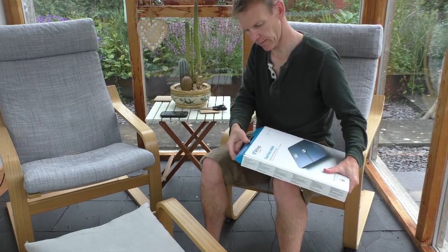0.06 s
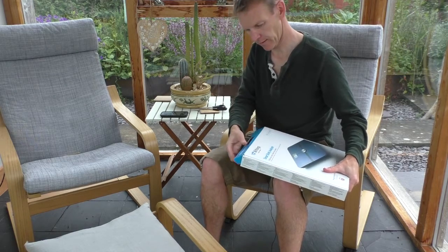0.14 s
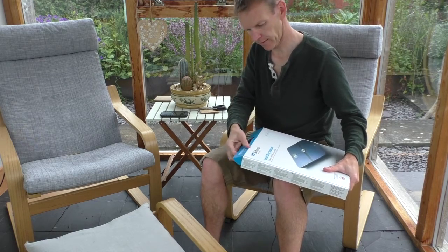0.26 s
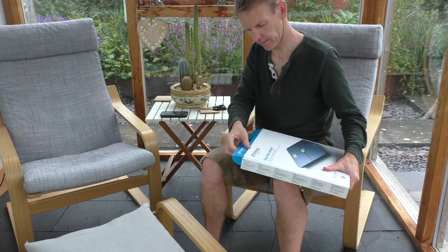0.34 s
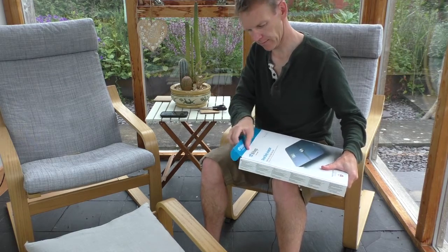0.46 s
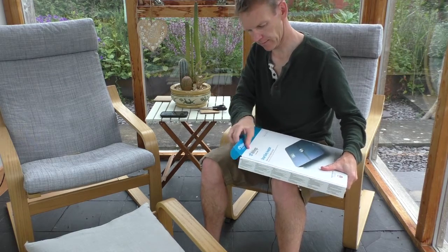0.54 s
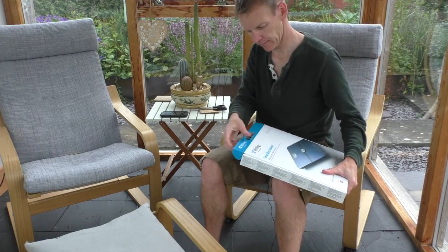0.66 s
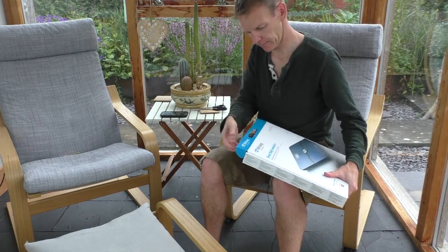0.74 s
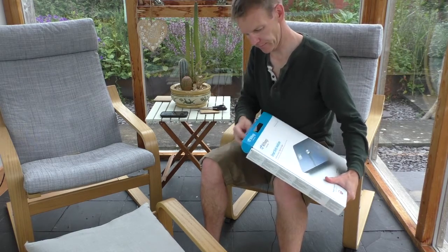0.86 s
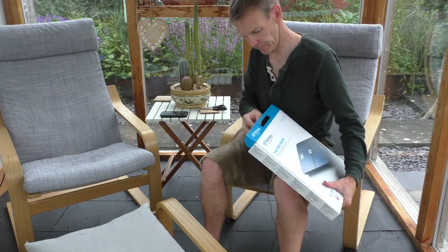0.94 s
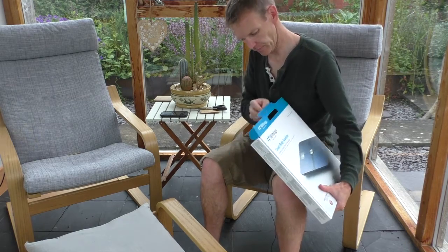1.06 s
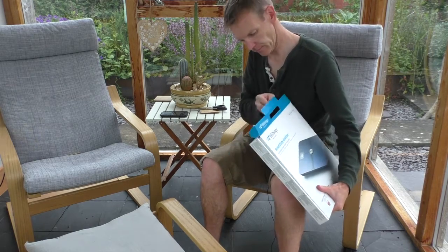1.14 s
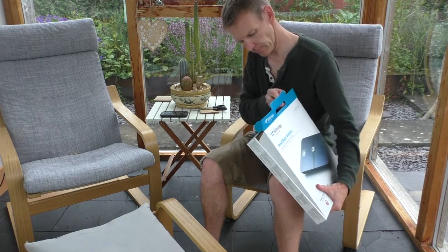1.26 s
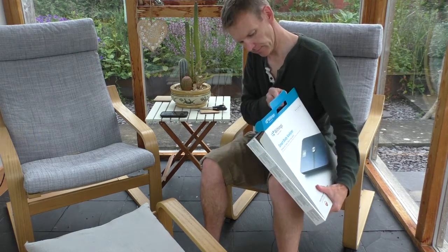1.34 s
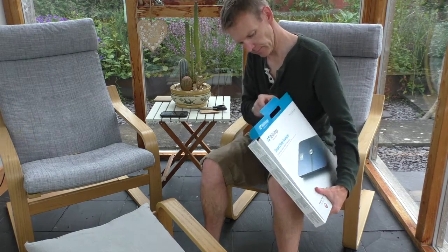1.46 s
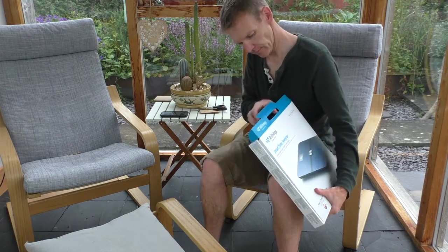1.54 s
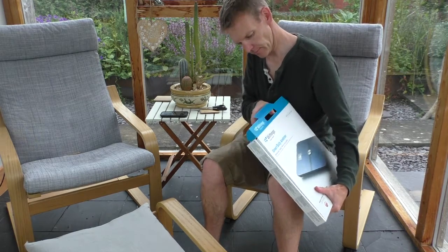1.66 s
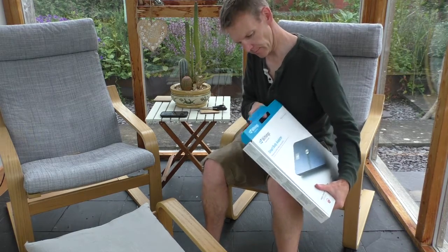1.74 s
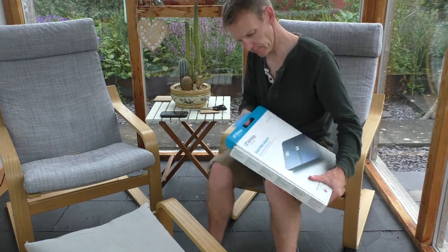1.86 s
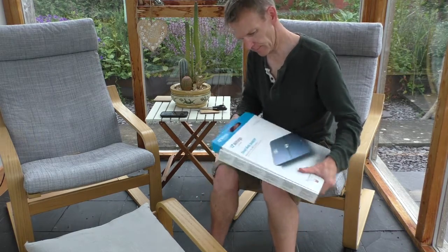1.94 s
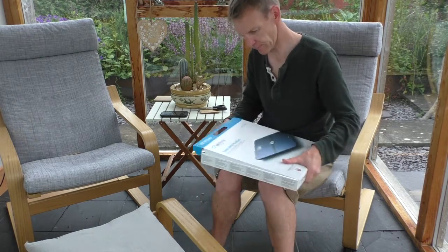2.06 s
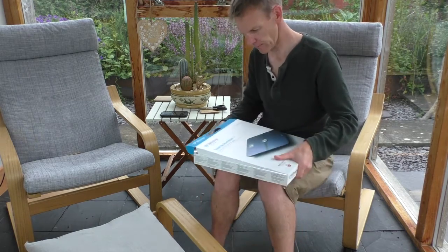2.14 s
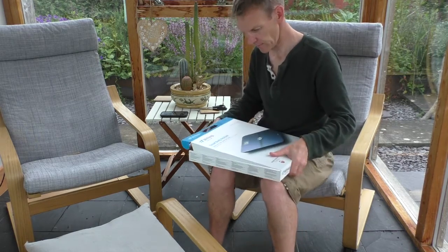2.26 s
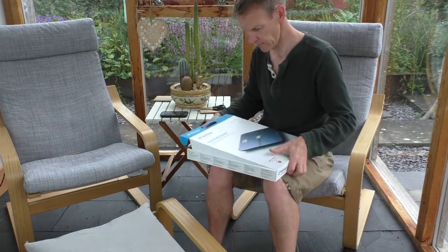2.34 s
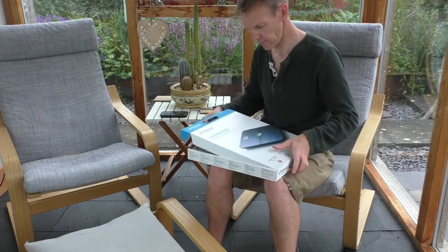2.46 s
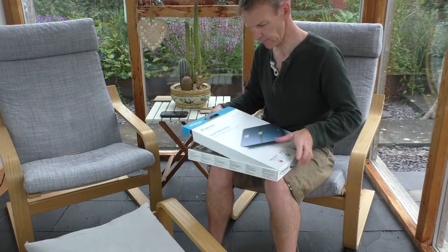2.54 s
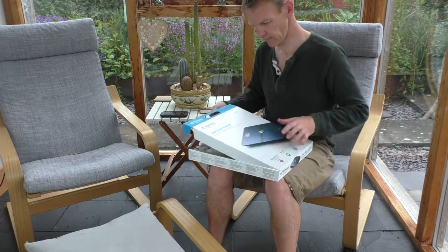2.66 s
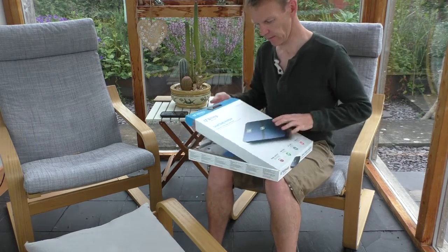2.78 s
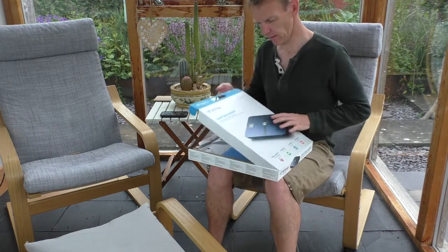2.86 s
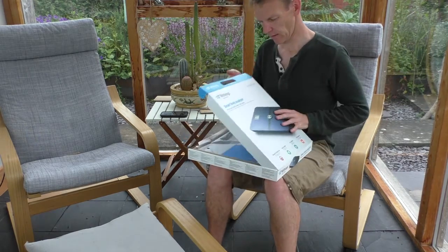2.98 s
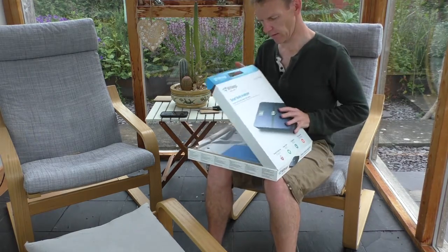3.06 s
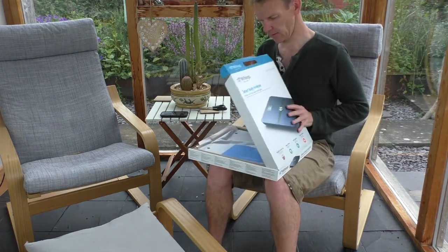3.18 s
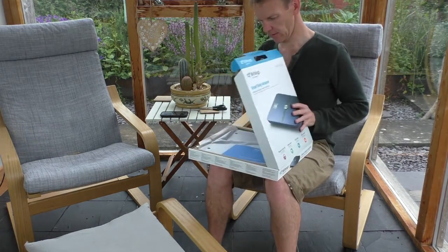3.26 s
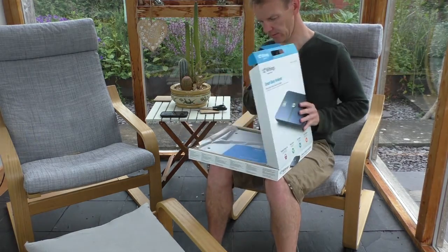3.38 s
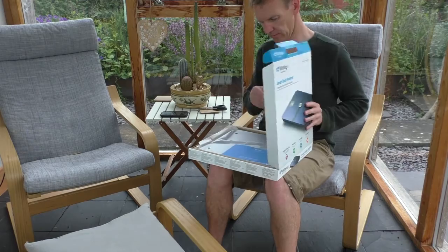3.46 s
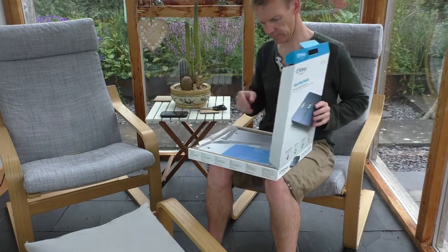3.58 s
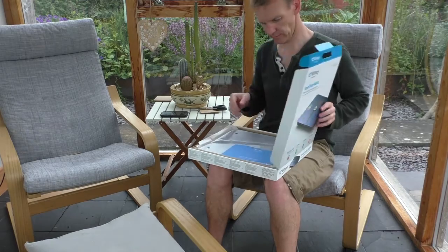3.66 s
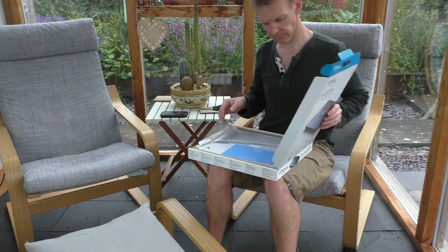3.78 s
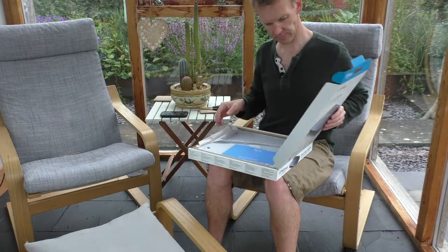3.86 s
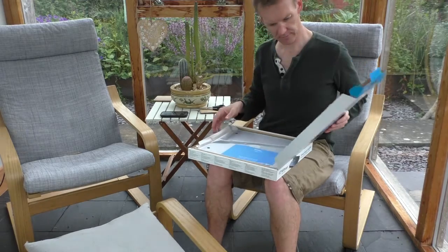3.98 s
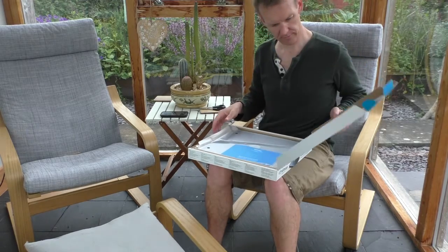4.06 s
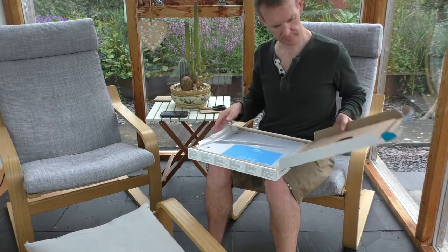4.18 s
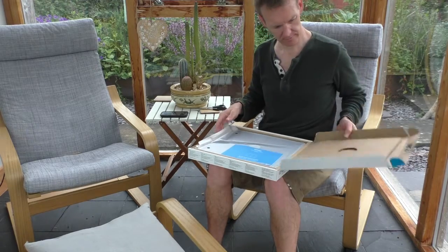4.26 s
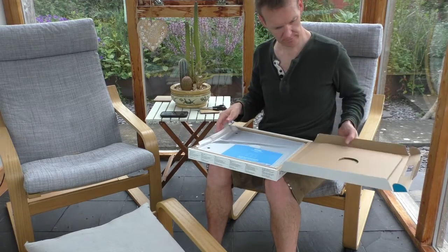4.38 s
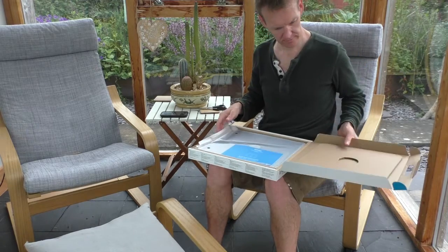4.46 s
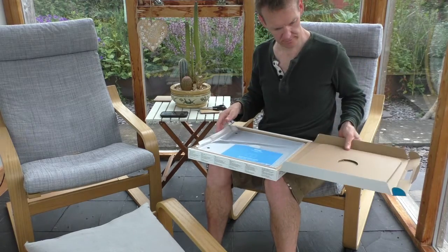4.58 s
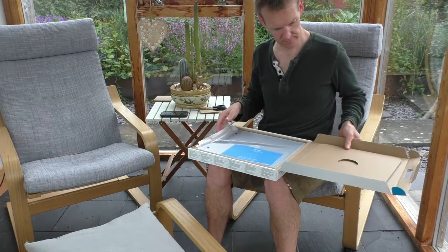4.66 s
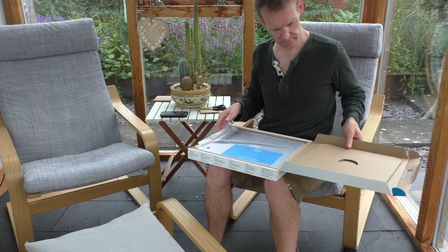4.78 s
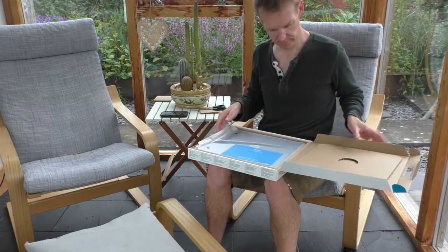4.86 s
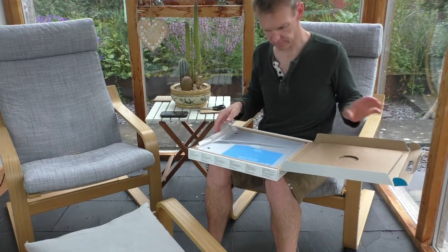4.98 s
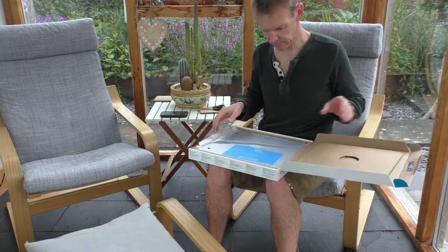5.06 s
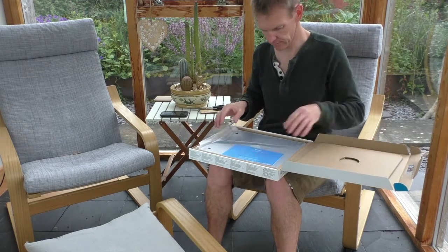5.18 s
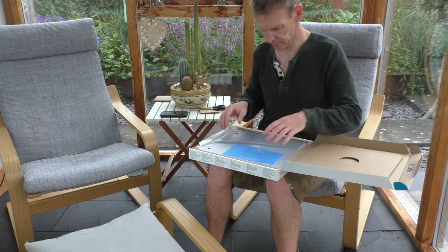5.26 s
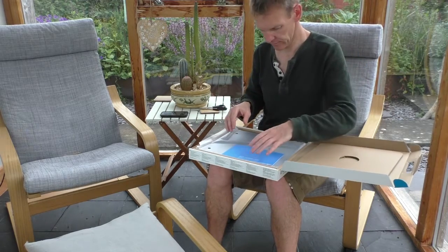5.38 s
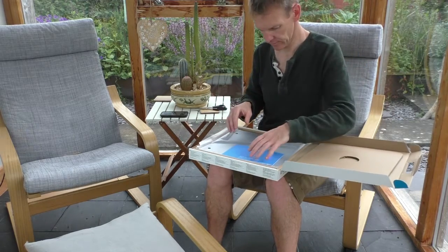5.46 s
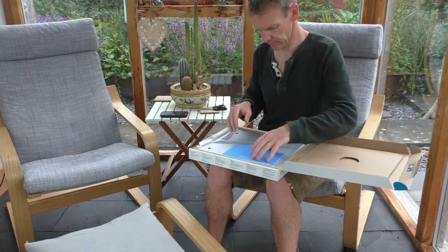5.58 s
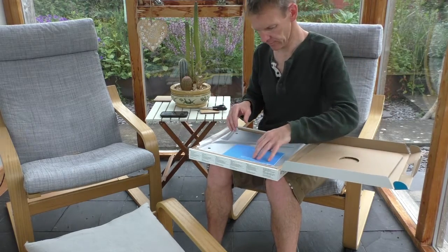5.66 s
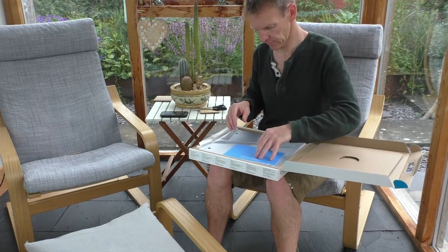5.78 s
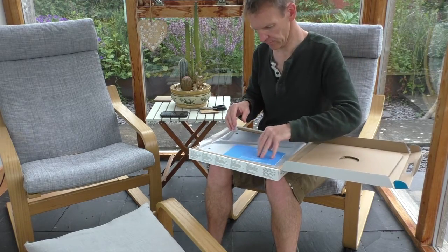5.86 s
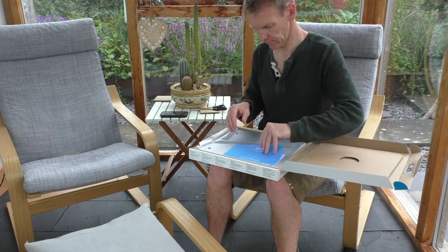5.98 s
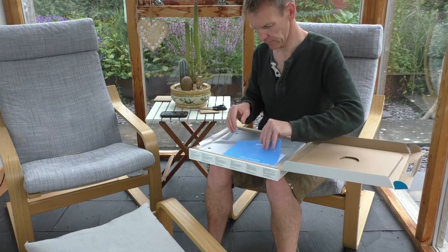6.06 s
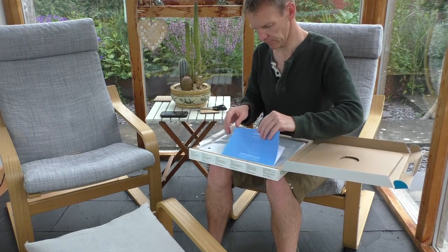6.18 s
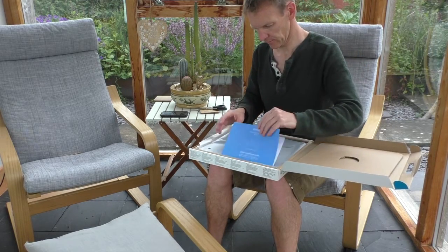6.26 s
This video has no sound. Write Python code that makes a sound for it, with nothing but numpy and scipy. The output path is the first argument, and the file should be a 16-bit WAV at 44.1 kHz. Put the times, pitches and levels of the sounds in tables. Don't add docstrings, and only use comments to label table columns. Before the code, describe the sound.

A flat cardboard box is rubbed, tapped and popped open on a lap, with hollow scrapes, soft low bumps and a faint papery slide at the end.

```python
import sys
import numpy as np
from scipy import signal
from scipy.io import wavfile
from scipy.ndimage import uniform_filter1d

SR = 44100
rng = np.random.default_rng(int(sys.argv[2]) if len(sys.argv) > 2 else 0)


def to_linear_factor(level_db):
    exponent = np.asarray(level_db, float) / 20
    return 10 ** exponent


def file_out(sig):
    cols = np.atleast_2d(sig).T
    lim = np.clip(cols, -1, 1)
    pcm = np.round(lim * 32767).astype(np.int16)
    wavfile.write(sys.argv[1], SR, pcm)


N = 279153

# t/s, peak level/dB, first push [+-1], f/Hz, t60/s
BUMPS = [(0.625, -56, -1, 64.8, 0.026), (0.916, -26, 1, 80, 0.023), (0.948, -36, 1, 109, 0.026),
         (1.181, -40, -1, 51, 0.078), (1.211, -32, -1, 34.2, 0.077), (1.345, -37, -1, 30.8, 0.13),
         (1.537, -29.5, -1, 24, 1), (1.723, -33.5, -1, 28.6, 0.066), (2.055, -43, 1, 36, .2),
         (2.105, -39, -1, 36, 0.2), (2.153, -33, 1, 32, 0.056), (2.177, -22.5, -1, 36, 0.11),
         (2.204, -33, -1, 42, 0.13), (2.62, -24, 1, 62, 0.065), (2.63, -27, -1, 54.7, .04),
         (2.659, -27, 1, 51.6, 0.13), (2.752, -37, 1, 40, 0.16), (2.952, -34, -1, 55, 0.15),
         (3.76, -44, 1, 60, 0.049), (3.767, -34.5, -1, 49, 0.08), (4.494, -34.5, -1, 51.7, 0.071),
         (4.565, -34.5, 1, 79.5, 0.057), (4.769, -35, -1, 130, .03), (4.774, -34, 1, 52.7, 0.04),
         (4.784, -37.5, -1, 109, 0.025), (4.824, -42, -1, 90, 0.058), (4.515, -41.5, 1, 121, 0.036),
         (4.533, -41, 1, 108, 0.034), (4.798, -44, -1, 98, 0.03), (4.81, -44, -1, 95, 0.058),
         (4.578, -32.5, -1, 111, 0.037)]
# t/s, sway of box and cable level/dB, freedom of the hollow to boom, relative level/dB
HOLD = [(0.0, -50.5, 8.5), (.3, -55, 6.5), (.63, -55.5, 9), (1.06, -52.5, 10.5), (1.29, -45.5, 4),
        (1.64, -50.5, 14), (2.11, -44.5, 4), (2.52, -53.5, 4), (2.7, -39, -1), (2.91, -55, 4),
        (3.26, -51.5, 11), (3.49, -61.5, 11), (3.93, -57.5, 21), (4.45, -60.5, 9.5), (4.69, -53, 13),
        (5.04, -60, 11), (5.98, -60.5, 14), (6.2, -54, 10)]


def unit_rms(x):
    return x / np.sqrt(np.mean(x ** 2) + 1e-20)


def curves(rows):
    s, *columns = np.transpose(rows)
    return [np.interp(np.arange(N) / SR, s, c) for c in columns]


def colour(points, size=4096):
    f_hz, db = np.transpose(points)
    hz = abs(np.fft.fftfreq(2 * size, 1 / SR))
    gain_db = np.interp(np.log(hz + 1), np.log(f_hz + 1), db, -70, -70)
    log_gain = np.log(to_linear_factor(gain_db))
    response = np.fft.ifft(np.exp(np.conj(signal.hilbert(log_gain)))).real[:size]
    return response / np.linalg.norm(response)


def through(x, response):
    return signal.oaconvolve(x, response)[:N]


def resonate(x, hz, width_hz):
    turn = np.exp(2j * np.pi * np.cumsum(hz) / SR)
    r = np.exp(-np.pi * width_hz / SR)
    smoothed = signal.lfilter([1 - r], [1, -r], x * turn.conj())
    return 2 * (turn * smoothed).real


def wobble(grain_s):
    size = max(int(grain_s * SR), 2)
    once = uniform_filter1d(rng.standard_normal(N), size)
    return unit_rms(uniform_filter1d(once, size))


def slips(per_s, spread_db, smooth, uneven_db, grain_s):
    size = to_linear_factor(spread_db * np.minimum(rng.exponential(1, N), 5)) * rng.standard_normal(N)
    grains = unit_rms(size * (rng.random(N) < per_s / SR))
    bed = smooth * rng.standard_normal(N)
    return unit_rms((grains + bed) * to_linear_factor(uneven_db * wobble(grain_s)))


def strokes(rows, extra_db=0):
    drop_db, roundness = 29.5, 1.143
    s, db, swell_s, fade_s = np.transpose(rows)[:4, :, None]
    t = np.arange(0, N + 32, 32) / SR
    away = np.where(t < s, (s - t) / swell_s, (t - s) / fade_s)
    power = to_linear_factor(2 * (db + extra_db - drop_db * away ** roundness)).sum(0)
    return np.sqrt(np.interp(np.arange(N) / SR, t, power))


def blows(rows, rise_s, rise_share, *ragged):
    return [(s, db, hz, rise_s + rise_share * t60, t60, *own, *ragged) for s, db, hz, t60, *own in rows]


def ring(rows, width_share, wide):
    out, t = np.zeros(N), np.arange(6000) / SR
    for (s, db, hz, rise_s, t60_s, ragged), z in zip(rows, rng.standard_normal((len(rows), 6000))):
        steady_hz = hz + 0 * t
        once = resonate(z, steady_hz, width_share * hz)
        band = unit_rms(resonate(once, steady_hz, width_share * hz))
        band += wide * unit_rms(resonate(z[::-1], 0.19 * steady_hz, 2 * hz))
        jerks = unit_rms(uniform_filter1d(z, size=250)) * np.minimum(t / 0.016, 1)
        band *= to_linear_factor(2.0 * jerks)
        ragged = np.clip(ragged, 0, 1)
        swell = (1 - np.exp(-t / max(rise_s, 1e-4))) ** 2 * to_linear_factor(-60 * t / max(t60_s, 0.004))
        tone = -np.sin(2 * np.pi * hz * t)
        blow = swell * ((1 - ragged) * tone + 1.03 * ragged * band)
        contact = 6.4 * hz * t
        blow -= 6.4 * ragged * np.exp(-rise_s / 0.0017) * contact * np.exp(-contact)
        start = round(s * SR)
        out[start:][:6000] += (to_linear_factor(db) * blow / abs(blow).max())[:N - start]
    return out


def room_air():
    # f/Hz, level/dB
    air = [(12, -9), (20, 16), (45, -4.5), (86, -15.5), (193, -18), (310, -17), (446, -34), (624, -28),
           (2260, -38), (4540, -103), (6360, -43), (8890, -32.5), (10500, -49.5), (12800, -35),
           (16000, -35)]
    return to_linear_factor(-61.5) * through(rng.standard_normal(N), colour(air, size=8192))


def sway():
    # f/Hz, level/dB
    rumble = [(6, -5.5), (15, 7), (35, -1), (70, -9), (130, -15.5), (200, -24)]
    lumps = rng.standard_normal(N) * to_linear_factor(curves(HOLD)[0] + 3.5 * wobble(0.059))
    return through(lumps, colour(rumble, size=16384))


def bumps():
    out, t = np.zeros(N), np.arange(12000) / SR
    slowed_s = 0.0375 * np.log(1 + t / 0.032)
    for s, db, push, hz, t60_s in BUMPS:
        onset = 1 - np.exp(-t * hz / 0.037)
        swing = np.sin(2 * np.pi * hz * slowed_s) * to_linear_factor(-60 * t / t60_s) * onset
        out[round(s * SR):][:12000] += np.sign(push) * to_linear_factor(db) * swing / abs(swing).max()
    return out


def room(x):
    # delay t/s, level/dB
    echoes = [(.0031, -33), (.0094, -35), (0.0131, -26), (0.017, -18)]
    t60_s, tail_db = 0.19, -8
    t = np.arange(12000) / SR
    sparse = rng.choice([-1., 1.], len(t)) * (rng.random(len(t)) < 0.05)
    tail = sparse * to_linear_factor(-60 * t / t60_s) * (t > 0.004)
    tail *= to_linear_factor(tail_db) / np.linalg.norm(tail)
    for delay_s, db in echoes:
        tail[round(delay_s * SR)] += to_linear_factor(db)
    return through(x, signal.lfilter([0.35], [1, -0.65], tail))


def taps():
    # t/s, peak level/dB, brightness f/Hz, t60/s
    tap_rows = [(.043, -39.5, 1500, .012), (0.171, -46, 2500, 0.023), (.2, -40.5, 2800, 0.049),
                (0.244, -40, 2500, .015), (0.272, -37, 1200, 0.023), (.325, -46, 1500, 0.021),
                (0.352, -41, 2000, .02), (0.494, -37, 2500, 0.011), (.837, -49, 1500, .015),
                (1.031, -54, 1200, 0.01), (1.972, -48.5, 2000, 0.032), (2.018, -48, 2000, .03),
                (2.147, -33, 900, .015), (2.17, -26, 1800, .015), (2.277, -33, 800, 0.018),
                (2.631, -48, 2000, .01), (2.662, -34, 1500, .012), (2.735, -43, 2500, .02),
                (2.809, -60, 1000, .015), (1.603, -55, 3200, 0.0087), (3.054, -49, 2000, 0.0092),
                (3.134, -39, 1500, 0.013), (3.402, -52, 2964, .01), (3.493, -51, 700, 0.009),
                (3.541, -45, 905, .01), (3.562, -50, 800, 0.011), (3.731, -54, 1500, .012),
                (3.749, -45, 1300, 0.055), (3.815, -51, 1500, 0.04), (3.855, -49, 1500, 0.038),
                (3.912, -52, 2500, .025), (3.952, -55, 1800, 0.049), (3.98, -49, 700, 0.055),
                (4.097, -65, 2000, .015), (4.286, -56, 2000, .015), (4.295, -49, 1500, 0.028),
                (4.491, -52, 2500, .03), (4.671, -55, 2500, .015), (4.684, -52, 2000, 0.013),
                (4.74, -65, 2500, .03), (4.769, -49, 2800, .04), (4.797, -47, 2800, 0.025),
                (4.812, -48, 2500, .02), (4.824, -47, 2800, .03), (4.86, -55, 2500, .02),
                (4.945, -64, 2500, .015), (5.032, -50, 2500, 0.035), (6.063, -59, 1500, .015),
                (6.106, -52, 1800, .02), (6.209, -34, 1800, 0.025)]
    rattle_share = 0.41
    out, t = np.zeros(N), np.arange(3000) / SR
    for (s, db, hz, t60_s), z in zip(tap_rows, rng.standard_normal((len(tap_rows), 3000))):
        r, contact = np.exp(-2 * np.pi * hz / SR), 2 * np.pi * hz * t
        dulled = signal.lfilter([1], [1, -2 * r, r ** 2], z)
        rattle = unit_rms(signal.lfilter([1, -1], [1, -0.9], dulled))
        push = np.e * contact * np.exp(-contact)
        out[round(s * SR):][:3000] += to_linear_factor(db) * (rattle_share * rattle * to_linear_factor(-60 * t / max(t60_s, 0.004)) - push)
    return out


def knocks():
    # t/s, peak level/dB, f/Hz, t60/s, raggedness [0-1]
    knock_rows = [(.26, -36.5, 258, 0.035, 0.53), (.455, -39, 480, 0.018, 0.18),
                  (.624, -34, 249, 0.03, 0.52), (.636, -30, 550, 0.01, 0.15), (.917, -37, 207, 0.067, 0.4),
                  (.945, -33.5, 290, 0.042, 0.54), (1.029, -36.5, 350, 0.025, 0.8),
                  (1.167, -34, 400, 0.027, 0.1), (1.19, -35, 370, 0.013, 0),
                  (2.147, -27.5, 288, 0.014, 0.26), (2.166, -28, 351, 0.034, 0.23),
                  (2.018, -39.5, 396, 0.042, 0.86), (2.734, -30.5, 440, 0.03, 0.68),
                  (3.411, -37, 217, 0.071, 0), (3.414, -38, 430, 0.024, 0.27),
                  (3.432, -38.5, 378, 0.059, 0), (3.415, -43, 772, 0.092, 0.48),
                  (3.783, -39.5, 200, 0.0084, 0), (4.5815, -35, 446, 0.016, 0.34),
                  (4.597, -41.5, 513, .015, 0.37)]
    return ring(blows(knock_rows, rise_s=0.0011, rise_share=0.087), width_share=1.0, wide=0.2)


def ticks():
    # t/s, peak level/dB, ring f/Hz, t60/s
    pops = [(.409, -38, 1310, 0.022), (.637, -34, 1310, 0.015), (.872, -44.5, 1720, 0.014),
            (1.167, -23, 800, 0.011), (1.763, -34.5, 1500, 0.016), (1.768, -27, 1550, 0.01),
            (1.77, -34.5, 910, 0.026), (2.7352, -25, 1980, 0.0085), (3.039, -27, 1400, 0.016),
            (3.0373, -43, 2700, 0.008), (4.1607, -47, 2105, 0.018), (4.2105, -41.5, 2100, 0.0092),
            (4.583, -40.5, 1080, 0.012), (4.583, -41, 1600, 0.0066), (4.694, -42, 2530, 0.0081)]
    # t/s, peak level/dB, ring f/Hz, t60/s
    scuffs = [(.622, -47.5, 990, 0.038), (.947, -38.5, 1280, 0.14), (1.189, -32, 860, 0.035),
              (1.722, -38, 1070, 0.023), (2.018, -43, 1170, 0.048), (2.03, -35.5, 732, 0.31),
              (2.3, -41, 1230, 0.51), (6.104, -41, 1520, .2), (6.121, -36.5, 1600, 0.17),
              (6.15, -37.5, 1616, .2)]
    # t/s, peak level/dB, ring f/Hz, t60/s
    edge_ticks = [(0.666, -50, 1440, 0.02), (1.736, -44.5, 2380, 0.011), (2.17, -28, 1500, 0.012),
                  (2.29, -38, 2500, 0.013), (3.356, -50, 1500, .012), (3.856, -50.5, 2000, 0.033),
                  (3.912, -51, 1900, 0.02), (4.488, -55, 2220, 0.13), (4.518, -43.5, 1490, 0.012),
                  (4.566, -37.5, 1330, 0.0081), (5.824, -60, 1700, 0.023), (6.044, -41, 1760, 0.01),
                  (3.315, -42, 2700, 0.0084)]
    # t/s, peak level/dB, centre f/Hz, t60/s
    snaps = [(.243, -47.5, 6800, 0.012), (.323, -50, 7000, 0.007), (.355, -47.5, 7400, 0.0072),
             (.407, -36, 5930, 0.0066), (.4473, -26, 11900, 0.0027), (1.42, -42, 8500, 0.0088),
             (1.605, -47, 6780, 0.018), (1.7632, -33, 6600, 0.0076), (1.77, -36, 7200, 0.0097),
             (2.537, -43.5, 6200, 0.0074), (2.621, -50, 5500, .008), (3.0395, -50.5, 9000, 0.0037),
             (3.053, -48, 8040, 0.006), (4.1623, -50, 5800, 0.0065), (5.033, -54, 8750, .01),
             (6.231, -36, 8200, 0.0079), (6.2435, -49, 8820, 0.0056)]
    below = signal.butter(6, 2850, fs=SR, output="sos")
    above = signal.butter(5, 5200, "high", fs=SR, output="sos")
    hits = blows(pops, 0.00026, 0.024, 0.33)
    hits += blows(scuffs, 0.00013, 0.053, 0.68)
    hits += blows(edge_ticks, 0.0027, 0.031, 0.88)
    card = ring(hits, width_share=0.38, wide=0.84)
    crack_db, crack_hz, crack_t60_s = -15, 6260, 0.015
    cracks = [(s, db + crack_db, crack_hz, crack_t60_s) for s, db, *_ in [*pops, *edge_ticks]]
    snapping = ring(blows([*snaps, *cracks], 0.000094, 0.013, 0.47), width_share=0.72, wide=0.16)
    dry_taps = taps()
    dulled = signal.sosfilt(below, card + signal.sosfilt(below, dry_taps))
    leak = 0.033 * card + 0.027 * dry_taps
    return dulled + leak + signal.sosfilt(above, snapping)


def fibre_hiss():
    # fastest at t/s, level/dB, swell t/s, fade t/s
    brushes = [(0.0, -62.5, .1, .16), (.3, -70.5, 0.32, 0.56), (.45, -66, 0.26, 0.14),
               (.63, -66, 0.009, .12), (.95, -61.5, 0.11, 0.27), (1.25, -45, 0.17, 0.13),
               (1.43, -57.5, 0.089, .3), (1.51, -47, 0.085, 0.12), (1.74, -68, 0.031, 0.013),
               (1.86, -72, 0.1, 0.2), (2.13, -46.5, 0.24, 0.35), (2.25, -52, 0.93, 0.32),
               (2.47, -64, 0.16, 0.15), (2.6, -62, 0.16, 0.26), (2.7, -57, 0.17, 0.01),
               (2.73, -56.5, 0.025, 0.094), (3.05, -68, 1, 0.089), (3.14, -63.5, 0.04, 0.24),
               (3.222, -49.5, 0.013, 0.093), (3.25, -47, 0.035, 0.02), (3.26, -46.5, 0.041, 0.013),
               (3.56, -72.5, 0.61, 0.75), (4.583, -61, 0.016, 0.043), (4.8, -65, 0.14, 0.091),
               (5.68, -71.5, 0.18, 0.16), (5.827, -68, 0.057, 0.078), (5.94, -62, 0.067, 0.23),
               (6.02, -69.5, 0.05, .08), (6.15, -57.5, 0.066, 0.2), (6.23, -58.5, 0.14, 0.28)]
    # fastest at t/s, level/dB, swell t/s, fade t/s
    fizzes = [(2.66, -76, .3, .2), (4.2, -84, .2, 0.22), (5.68, -78, .15, 0.18), (5.83, -78, .15, 0.14),
              (5.97, -77, .2, 0.18)]
    # f/Hz, level/dB
    sheen = [(1940, -1.5), (3300, -10), (4140, -10), (4570, -13.5), (5430, -2), (6970, -1), (7810, -1.5),
             (9050, -3.5), (10000, -5.5), (10700, -81), (13900, -47), (22000, -120)]
    # f/Hz, level/dB
    top = [(9500, -7), (10600, -16.5), (12000, -6), (13700, -7), (15200, -9.5), (16500, -26)]
    resting_db = -82.5
    fibre = np.hypot(strokes(brushes), to_linear_factor(resting_db))
    brush = fibre * slips(per_s=6000, spread_db=1.7, smooth=0.9, uneven_db=1.05, grain_s=0.0045)
    whine_hz = 7000 + 35 * (20 * np.log10(fibre) + 60) + 450 * wobble(0.014)
    hiss = 0.43 * brush + 0.97 * resonate(brush, whine_hz, width_hz=2190)
    top_gain = to_linear_factor(-15.5 + 1.6 * wobble(0.063)) * fibre ** -0.08
    fizz = brush * (top_gain + strokes(fizzes) / fibre)
    return through(hiss, colour(sheen)) + through(fizz, colour(top))


def card_friction():
    # hardest at t/s, level/dB, swell t/s, fade t/s, thin edge relative level/dB
    drags = [(0.0, -48, .1, 0.14, -4), (0.253, -56.5, 0.11, 1.3, -15), (.39, -54.5, 0.41, 0.11, 0.5),
             (.49, -53, 0.11, 0.084, -4), (0.634, -55.5, 0.022, 0.11, 1), (0.966, -53, 0.19, 0.15, 0.5),
             (1.19, -49.5, 0.24, 0.32, 0.5), (1.25, -52, 0.088, 0.13, 8), (1.31, -51, 0.23, 0.1, 5.5),
             (1.399, -53, 0.053, 0.25, 9.5), (1.461, -58, 0.14, 0.17, 12), (1.54, -51.5, 0.17, 0.18, 6.5),
             (1.82, -58.5, 0.34, 0.16, -2), (2.059, -49.5, 0.24, 0.42, 5), (2.17, -41.5, 0.15, 0.25, -5),
             (2.342, -49, 0.13, 0.32, -2), (2.65, -52, 1.26, 0.63, -2), (2.8, -59.5, 0.48, 1.4, -20),
             (3.0, -61, 0.52, 0.059, 7), (3.232, -59.5, 0.95, 0.083, 10), (3.42, -64, 0.03, 0.18, 8),
             (3.86, -73.5, 0.079, 0.18, 2), (4.6, -67.5, 0.06, 0.16, 0), (4.69, -66, .1, 0.11, -1.5),
             (4.79, -67, 0.13, 0.15, 9), (5.32, -68.5, 0.67, 0.56, -7), (6.18, -62, 0.25, 0.071, 12),
             (6.236, -56, 0.047, 0.07, 9), (6.29, -60, 0.059, 0.18, 10.5)]
    # f/Hz, level/dB
    face = [(260, -7.5), (450, -3), (579, -4), (807, 0), (978, -7), (1500, -12.5), (1950, -19),
            (3300, -120)]
    # f/Hz, level/dB
    hollow = [(59, -12.5), (100, 0), (215, -2.5), (259, -2.5), (366, -8.5), (450, -15.5), (520, -26),
              (680, -26.5), (1140, -120)]
    # f/Hz, level/dB
    thin_edge = [(820, -13), (1400, 0.5), (2360, -4.5), (2980, -12), (3300, -22), (3810, -19),
                 (4600, -26.5), (5980, -50), (10100, -120)]
    resting_db, resting_edge_db = -75.5, 0.5
    thud_db, thud_t60_s = -17.5, 0.051
    scrape = np.hypot(strokes(drags), to_linear_factor(resting_db))
    edge = np.hypot(strokes(drags, np.array(drags)[:, -1:]), to_linear_factor(resting_db + resting_edge_db))
    thuds = [(s + 0.0054, db + thud_db, 0.01, thud_t60_s) for s, db, *_ in BUMPS]
    boom = np.hypot(scrape * to_linear_factor(curves(HOLD)[1]), strokes(thuds))
    drag = slips(per_s=3500, spread_db=2.5, smooth=0.83, uneven_db=1.5, grain_s=0.017)
    creak = slips(per_s=480, spread_db=3.5, smooth=0.53, uneven_db=0.5, grain_s=0.062)
    card = through((0.43 * drag + 0.92 * creak) * boom * to_linear_factor(-5.5), colour(hollow))
    card += through(drag * scrape, colour(face))
    card += through(drag * edge, colour(thin_edge))
    return card


def panel_ring(card):
    # f/Hz, width f/Hz, level/dB
    panels = [(236, 55, -7.5), (370, 57, 1), (558, 143, 5.5), (862, 139, 2.5), (1857, 155, -3),
              (2225, 186, -6), (2630, 430, -6.5), (1337, 135, -8)]
    rung = np.zeros(N)
    for hz, width_hz, db in panels:
        gain = to_linear_factor(db + 2.63 * wobble(0.045))
        rung += gain * resonate(card, hz * (1 + 0.096 * wobble(0.13)), width_hz)
    return rung


def rubbing():
    card = card_friction()
    return 0.37 * card + 0.7 * panel_ring(card) + fibre_hiss()


def scene():
    rub = rubbing()
    hits = ticks() + knocks()
    echo = room(hits + 0.29 * rub)
    return (rub + hits + echo + bumps() + sway() + room_air())[None]


def band_limit(x):
    return signal.sosfilt(signal.butter(12, 16460, fs=SR, output="sos"), x)


def record(dry):
    low_pass = signal.firwin(255, 16300, fs=SR)
    mix = signal.oaconvolve(dry, low_pass[None], "same")
    return band_limit(mix)


dry = scene()
out = record(dry)
file_out(out)
```